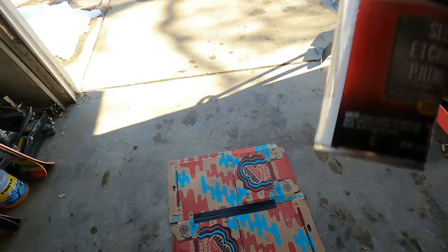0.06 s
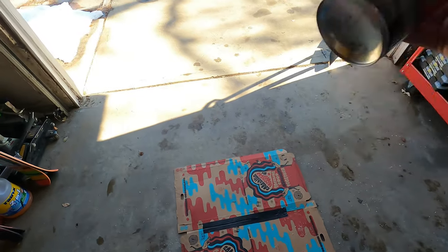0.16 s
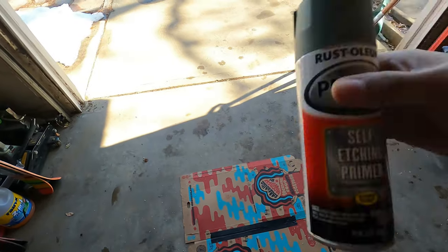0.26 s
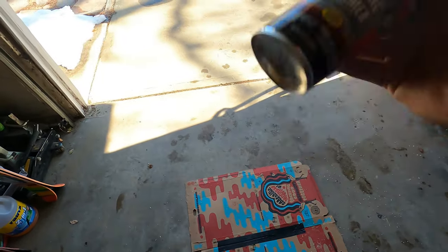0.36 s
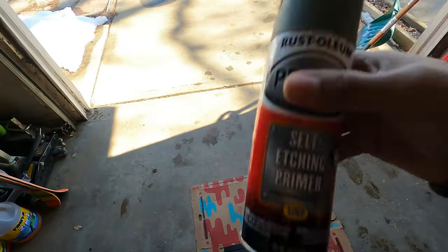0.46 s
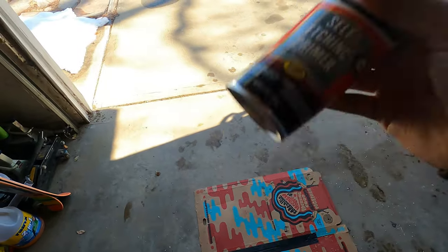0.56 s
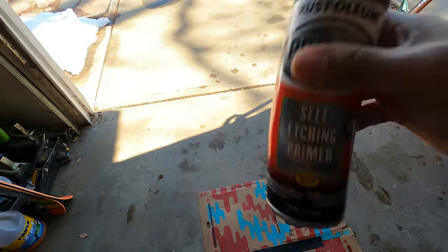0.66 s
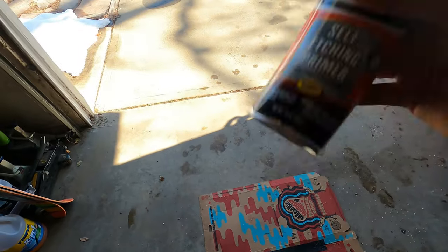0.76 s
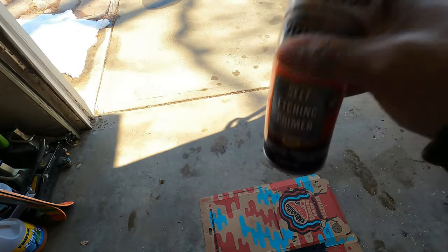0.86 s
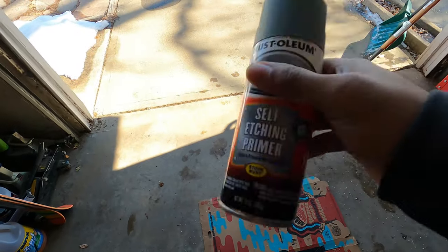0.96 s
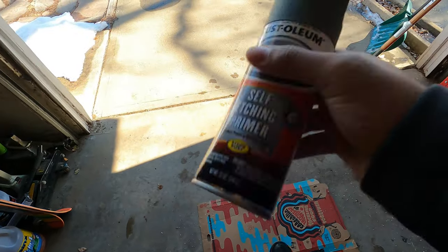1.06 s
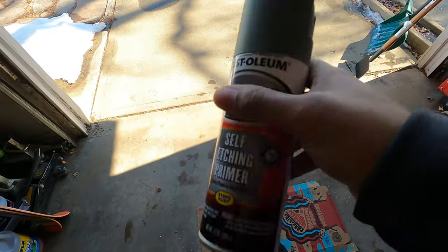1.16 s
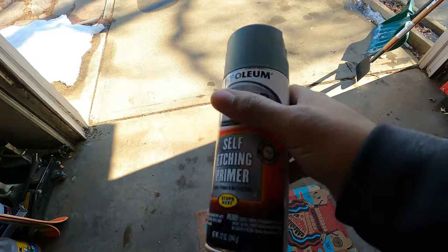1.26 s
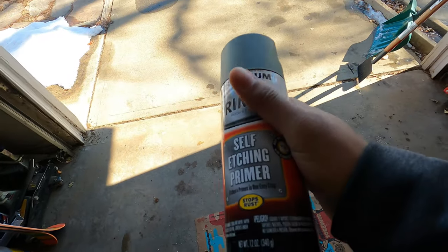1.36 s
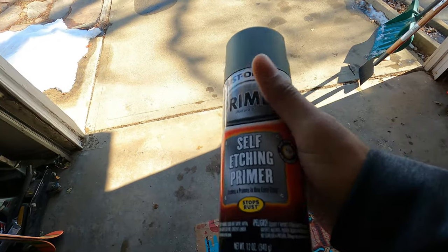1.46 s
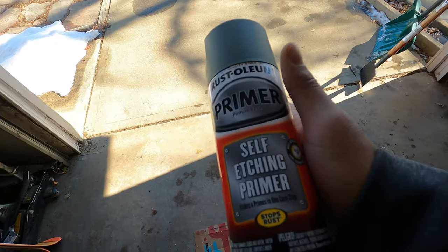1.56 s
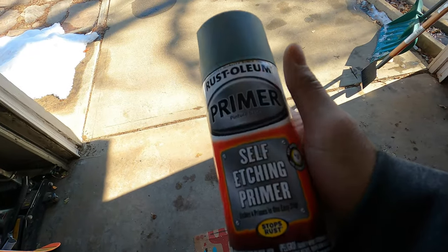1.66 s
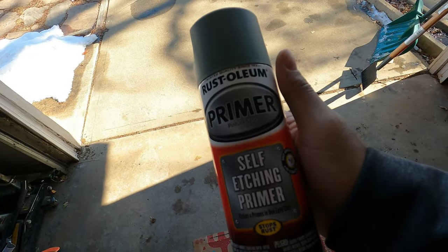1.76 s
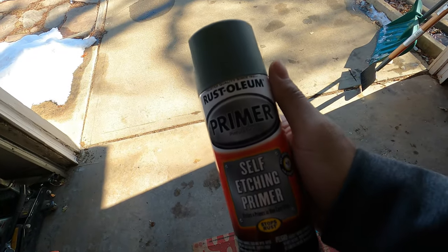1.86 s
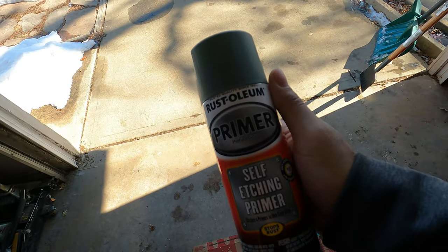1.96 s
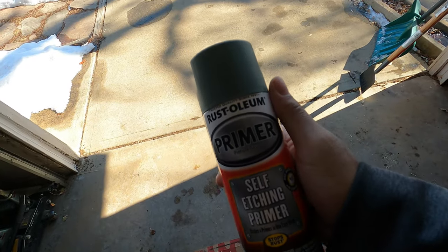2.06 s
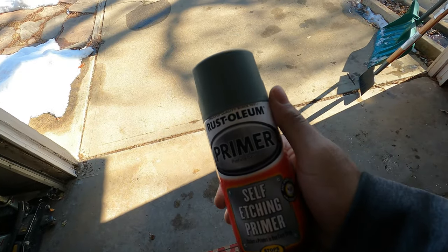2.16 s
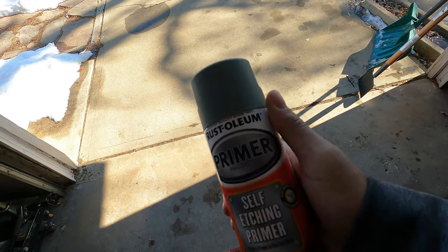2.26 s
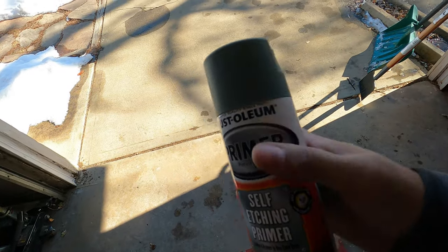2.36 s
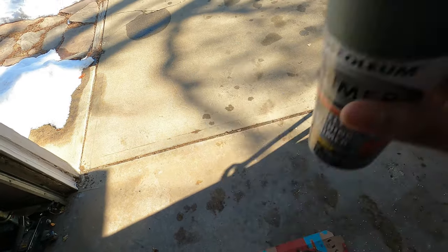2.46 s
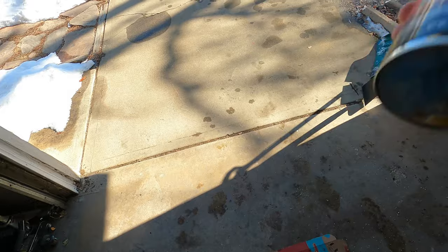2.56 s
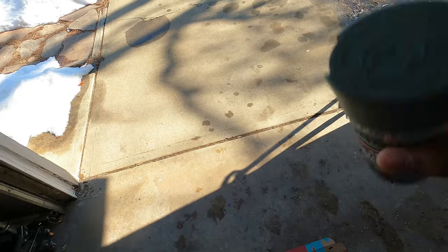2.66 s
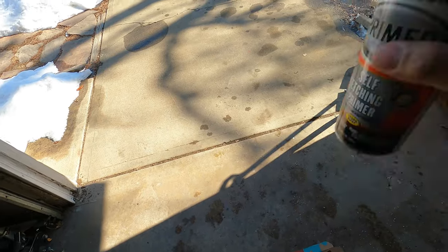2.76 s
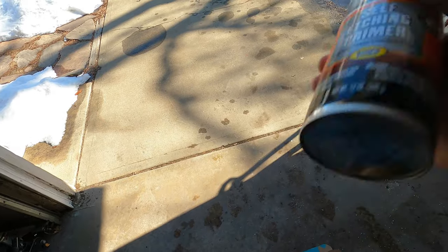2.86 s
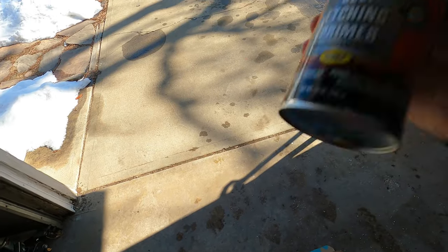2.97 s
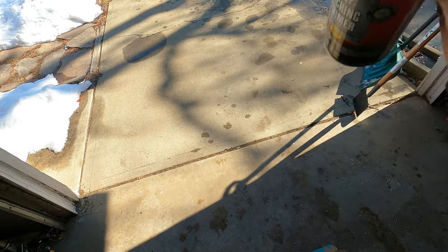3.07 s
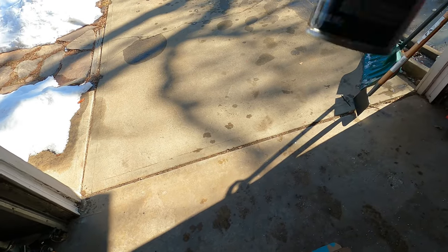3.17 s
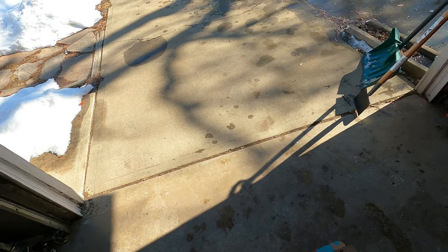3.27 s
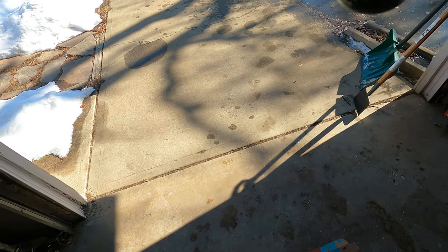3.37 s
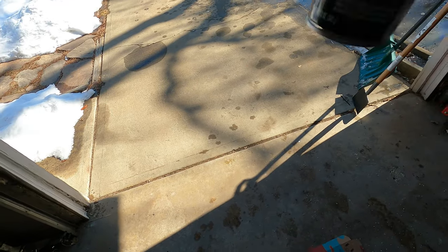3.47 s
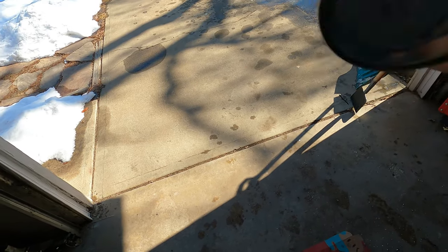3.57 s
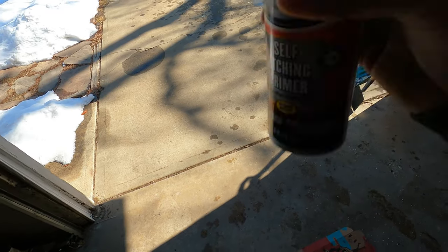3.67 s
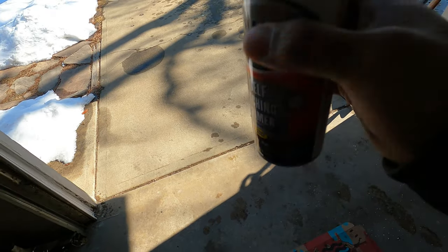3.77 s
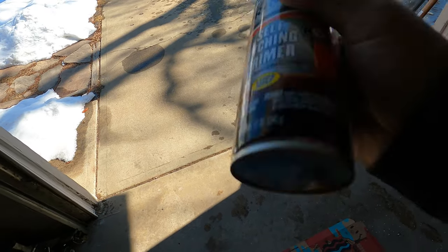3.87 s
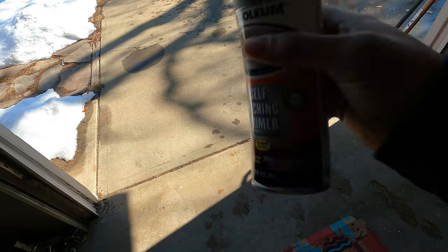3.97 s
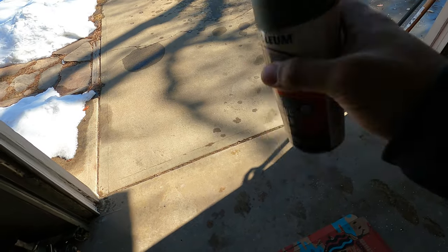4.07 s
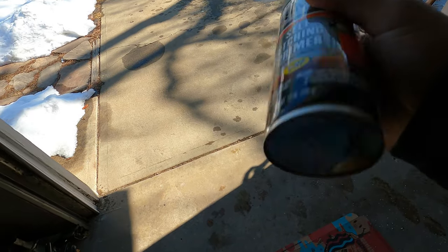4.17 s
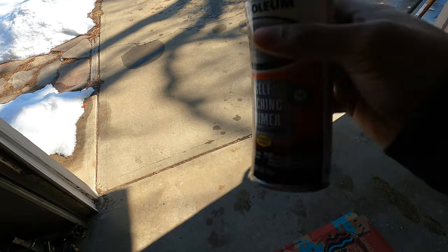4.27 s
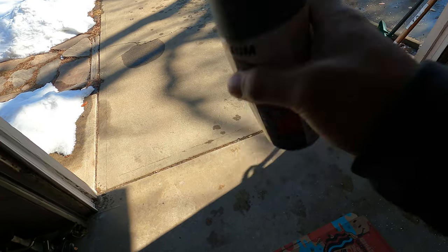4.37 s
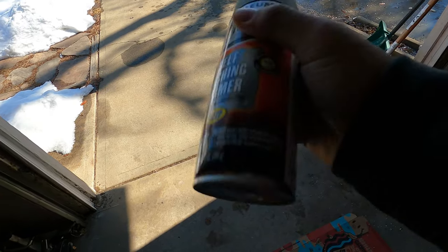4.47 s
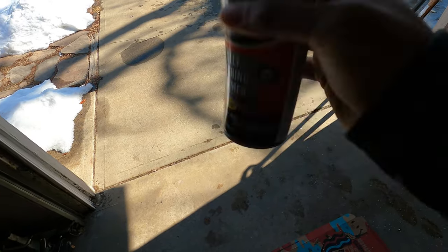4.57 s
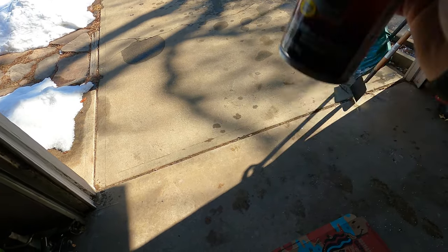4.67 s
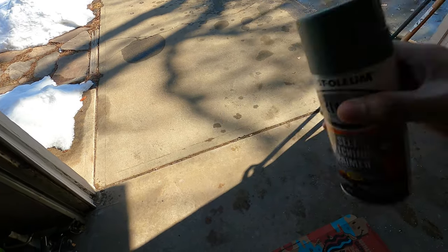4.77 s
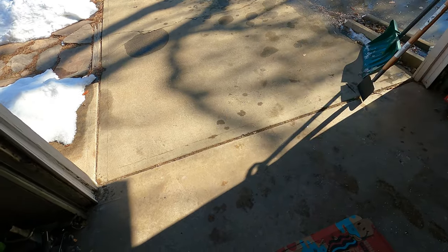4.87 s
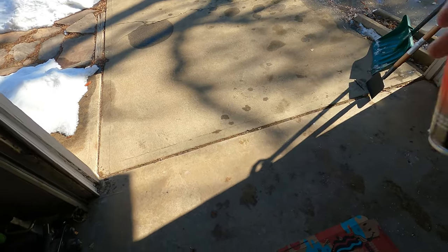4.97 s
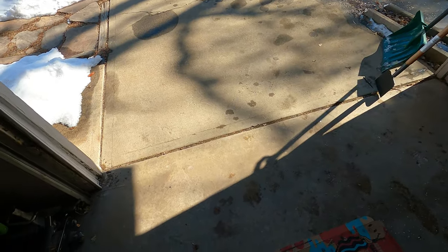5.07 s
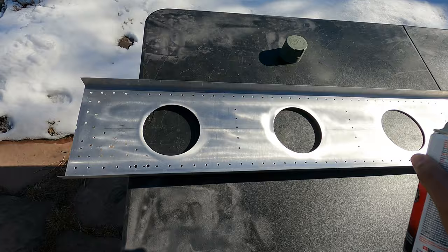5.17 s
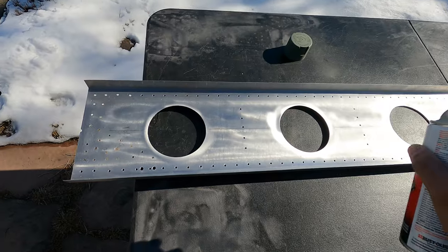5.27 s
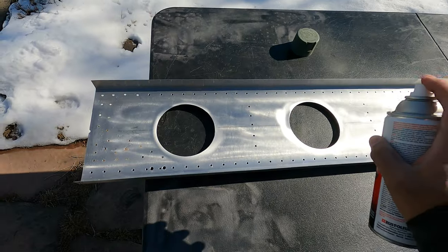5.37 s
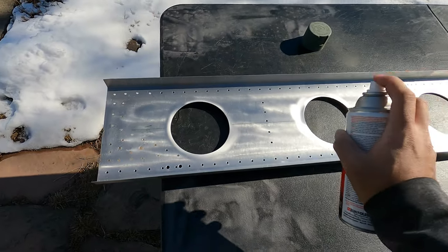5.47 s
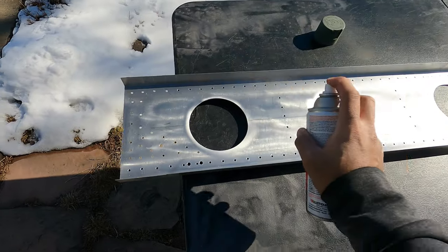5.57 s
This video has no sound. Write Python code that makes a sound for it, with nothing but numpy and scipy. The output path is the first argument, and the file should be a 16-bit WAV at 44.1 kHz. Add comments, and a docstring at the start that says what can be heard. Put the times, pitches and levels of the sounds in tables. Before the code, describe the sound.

Hard, dry rattling of a mixing ball inside an aerosol can, pausing midway, then fast and dense before stopping to leave distant traffic.

```python
"""An aerosol can is turned and shaken in a garage doorway, about an arm's length away.
Its mixing ball knocks on the paint-damped steel, made of short fading tones; short noise swells in
narrow bands surround a few knocks. Filtered noise gives the washing paint, faint rustles of hand and
sleeve, and distant traffic. The garage answers with a short noise-like tail. Near the end paint and
garage stop, leaving the traffic with one or two faint rustles."""
import sys
import numpy as np
from scipy import signal
from scipy.fft import rfft, irfft
from scipy.io import wavfile
from scipy.ndimage import uniform_filter1d

SR = 44100
rng = np.random.default_rng(int(sys.argv[2]) if len(sys.argv) > 2 else 0)


def transcribe(u):
    """Save the signal u as a 16-bit wav file named by the first command-line argument.

    u: samples, shape (n,) or (channels, n), limited to [-1, 1]; the rate is SR.
    q: integer samples, one column per channel.
    """
    v = np.clip(np.atleast_2d(u).T, -1, 1)
    q = np.round(v * 32767).astype(np.int16)
    wavfile.write(sys.argv[1], SR, q)


def amplitude_ratio(level_db):
    """Convert a level in decibels to the matching linear amplitude (field) ratio."""
    exponent = np.asarray(level_db, float) / 20
    return 10 ** exponent


N = 248283
T = np.arange(N) / SR
STOP_S = 5.246  # paint and garage tail end here
# natural tones of the thin shell of the can: pitch_hz, width_hz, level_db
SHELL_MODES = [(2120, 62, -16), (2470, 230, -8), (2800, 110, 7.5), (3020, 490, 2.5), (3560, 510, -2),
               (4100, 1350, 2.5), (4520, 450, 3), (5350, 160, 9), (6030, 750, 4), (6840, 600, 7.5),
               (8000, 71, 12)]


def curves(table):
    """Draw every column after the first as a line over time, sample by sample."""
    times_s, *columns = np.transpose(table)
    return [np.interp(T, times_s, column) for column in columns]


def unit(x):
    """Scale a sound to an average (rms) level of 1."""
    return x / np.sqrt(np.mean(x ** 2))


def shape(x, points):
    """Colour a sound by points of pitch_hz, level_db, joined evenly over the octaves."""
    point_hz, point_db = np.transpose(points)
    freq_hz = np.arange(N // 2 + 1) * SR / N + 1
    gain_db = np.interp(np.log(freq_hz), np.log(point_hz), point_db)
    return irfft(rfft(x) * amplitude_ratio(gain_db), N)


def resonate(x, peaks):
    """Pass a sound through resonances side by side (pitch_hz, width_hz, level_db), each applied twice."""
    freq_hz = np.arange(N // 2 + 1) * SR / N + 1
    gain = sum(amplitude_ratio(db) / (1 + 1j * (freq_hz - hz ** 2 / freq_hz) / width) ** 2 for hz, width, db in peaks)
    return irfft(rfft(x) * gain, N)


def walk(rate_hz):
    """Wander at random: levels held for 1 / rate_hz seconds, smoothed twice, then scaled to rms 1."""
    hold = int(SR / rate_hz)
    steps = np.repeat(rng.standard_normal(N // hold + 1), hold)
    smooth = uniform_filter1d(uniform_filter1d(steps, hold), hold)
    return unit(smooth[:N])


def grains(scatter_db):
    """Make noise whose samples are now and then much larger, like droplets and grit."""
    noise = rng.standard_normal(N)
    boost = np.minimum(rng.exponential(size=N), 7)
    return noise * amplitude_ratio(scatter_db * boost)


def swell(top_s, rise_s, fade_s):
    """Climb exponentially to a level of 1 at top_s, then die away exponentially."""
    return np.exp(-np.where(T < top_s, (top_s - T) / rise_s, (T - top_s) / fade_s))


def ring(t, hz, db, t60_s, push_s):
    """One tone swells smoothly during the contact and dies fast under the paint; it peaks at db."""
    envelope = (1 - np.exp(-t / push_s)) ** 2 * np.exp(-np.log(1000) * t / t60_s)
    return amplitude_ratio(db) * envelope / envelope.max() * np.exp(2j * np.pi * hz * t)


def knocks():
    """Each blow rings wall, dome, ticks and body; signs, decays and tick mix vary at random from blow to blow."""
    # blows of the ball on steel: start_s, wall_level_db, wall_pitch_hz, dome_level_db, tick_level_db
    ball_blows = [(0.0423, -24.5, 990, -21, -34.5), (0.0456, -20.5, 2080, -37, -49),
                  (0.3053, -32, 1020, -33, -47), (0.412, -9, 2500, -10, -25.5),
                  (0.4862, -8.5, 1490, -13, -24.5), (0.5422, -12, 1430, -25, -27.5),
                  (0.603, -17, 2450, -12, -40), (0.6035, -14.5, 1850, -17, -29.5),
                  (0.6425, -17, 1150, -34, -44.5), (0.6861, -12, 1550, -22, -17),
                  (0.6954, -11, 1440, -20, -27), (0.7219, -13, 1520, -24, -31),
                  (0.744, -23, 1550, -33, -44), (0.8036, -17.5, 1840, -7.5, -22.5),
                  (0.854, -11, 1640, -15, -37), (0.875, -12, 1450, -22, -41),
                  (0.8967, -12.5, 1700, -24, -47), (0.9037, -17, 1100, -36, -40.5),
                  (0.9343, -13.5, 1500, -22, -37), (0.9456, -16.5, 1140, -24, -27.5),
                  (0.9672, -15, 1660, -19.5, -40), (0.982, -15, 1430, -42, -40),
                  (1.0944, -10.5, 1960, -19, -35), (1.1433, -8.5, 1760, -21.5, -26),
                  (1.1745, -15, 1180, -18, -29.5), (1.1978, -13.5, 2130, -22.5, -31),
                  (1.2152, -14, 1150, -32.5, -32.5), (1.2418, -10.5, 1480, -13.5, -29),
                  (1.2708, -13, 1000, -18, -28.5), (1.2734, -14, 1460, -38, -40),
                  (1.3039, -15, 1650, -30, -50), (1.4026, -18, 1770, -25, -39.5),
                  (1.4922, -8, 1730, -18.5, -32), (1.5809, -22, 1240, -31, -43),
                  (1.6206, -15, 1440, -24, -40.5), (1.6786, -16.5, 1230, -24.5, -38),
                  (1.725, -23, 1710, -37, -46), (2.0193, -18.5, 2170, -18.5, -40),
                  (2.156, -25, 1080, -23, -53), (2.2223, -36, 990, -33, -64), (2.673, -37, 1100, -34, -52),
                  (2.7485, -25, 990, -34, -49.5), (2.7743, -9, 1210, -19.5, -35),
                  (2.839, -12.5, 1620, -25, -30), (2.8957, -16.5, 1750, -20, -34.5),
                  (2.913, -16, 1360, -32, -48), (2.9768, -16, 1830, -25, -26),
                  (2.9823, -10.5, 1570, -26, -34), (2.9875, -9.5, 1500, -35, -46),
                  (2.991, -13, 1700, -30, -43), (3.0028, -8.5, 2180, -26, -36.5),
                  (3.0139, -15, 1130, -24, -33), (3.045, -16.5, 1340, -18.5, -34),
                  (3.0749, -12.5, 1170, -16.5, -30), (3.086, -11, 1560, -13, -30),
                  (3.0984, -31, 1630, -24, -39), (3.1123, -12, 1930, -15.5, -44),
                  (3.1439, -13, 1260, -19, -34), (3.1747, -18, 1800, -12.5, -20),
                  (3.1964, -7.5, 1700, -19.5, -23), (3.245, -9, 1420, -13, -30),
                  (3.267, -10.5, 1330, -17, -42.5), (3.286, -18, 1650, -25, -39.5),
                  (3.3214, -11, 1650, -12.5, -23), (3.3274, -13.5, 1620, -30, -35),
                  (3.4135, -13.5, 1350, -25, -50), (3.4262, -11.5, 2400, -30, -37),
                  (3.4315, -19, 1670, -28, -43), (3.4582, -17, 1610, -31, -33), (3.565, -8, 1820, -24, -41),
                  (3.5704, -16, 2250, -40, -27), (3.5764, -9.5, 1260, -34, -27),
                  (3.5824, -20, 1800, -34, -34), (3.6016, -12, 1760, -42, -51.5),
                  (3.666, -10, 1540, -21.5, -32), (3.6774, -23, 1360, -29, -42),
                  (3.6928, -11, 1320, -21.5, -36), (3.717, -11, 1320, -28, -43),
                  (3.7362, -10.5, 1850, -19, -18.5), (3.7655, -7.5, 1520, -34, -43),
                  (3.7866, -22, 1750, -28, -35.5), (3.8062, -22, 1320, -32, -40),
                  (3.8097, -14, 1540, -19, -51), (3.8234, -16, 1350, -20.5, -39),
                  (3.8389, -7, 1400, -23, -42), (3.8614, -11.5, 1286, -30, -42),
                  (3.8781, -16, 1340, -24, -36), (3.8904, -9.5, 1600, -11.5, -19),
                  (3.9138, -8.5, 1550, -31, -38), (3.931, -19, 1740, -29, -37),
                  (3.9586, -10.5, 1410, -21.5, -28), (3.987, -6.5, 1500, -24.5, -38),
                  (4.0178, -13, 1770, -33, -40), (4.0198, -9, 1800, -30, -31),
                  (4.0352, -34, 1950, -30, -31), (4.0554, -7.5, 1630, -25.5, -37),
                  (4.1001, -19, 1180, -29, -34), (4.1085, -16, 1200, -21, -23.5),
                  (4.131, -9, 1640, -27, -42), (4.1513, -11, 1700, -27, -34),
                  (4.1669, -10.5, 1730, -21, -34.5), (4.1844, -23, 1680, -17, -24.5),
                  (4.2086, -8.5, 1360, -18.5, -29), (4.2529, -19, 1060, -31, -37),
                  (4.2527, -9.5, 1110, -17, -25.5), (4.2791, -10.5, 1430, -23.5, -35),
                  (4.2932, -15, 1780, -26, -47), (4.3136, -13.5, 1120, -26, -35.5),
                  (4.3303, -12, 1890, -13.5, -16.5), (4.3601, -10.5, 1770, -20.5, -31),
                  (4.3997, -16, 1230, -24, -30.5), (4.4054, -16, 1140, -20, -25),
                  (4.4161, -13.5, 1320, -18.5, -40), (4.4325, -9, 1610, -26, -37),
                  (4.4712, -15, 1700, -23, -37), (4.4862, -11, 1810, -13, -20),
                  (4.5233, -17.5, 1320, -21, -40), (4.568, -13, 1430, -21, -35),
                  (4.585, -16.5, 1400, -27, -37.5), (4.6341, -9.5, 1320, -13, -19.5),
                  (4.6557, -10.5, 1590, -27.5, -41), (4.6687, -20, 1290, -32, -34),
                  (4.677, -21, 1320, -24, -37), (4.7075, -10.5, 1880, -15, -26),
                  (4.7388, -11, 1640, -22, -31), (4.7594, -17, 1440, -21, -30),
                  (4.78, -16, 1140, -23.5, -32), (4.8047, -8.5, 1730, -25, -24.5),
                  (4.8516, -8, 1770, -18, -41), (4.8777, -6.5, 1980, -22, -23.5),
                  (4.8866, -21, 2360, -19, -45), (4.8948, -17, 2030, -26, -47),
                  (4.9023, -22, 2290, -34, -35.5), (4.9188, -21, 2180, -15.5, -32),
                  (4.93, -19.5, 1700, -30, -51), (4.9809, -23, 1700, -30, -53),
                  (5.004, -13, 1920, -23, -35), (5.0217, -19, 1310, -28, -40),
                  (5.037, -16.5, 1510, -33, -49), (5.1018, -10.5, 2200, -16, -18.5),
                  (5.1154, -25, 1750, -47, -44), (5.1245, -20, 1760, -46.5, -35),
                  (5.175, -17.5, 1890, -30, -26), (5.2009, -18.5, 1020, -40.5, -41)]
    # dome pitch before a small scatter, moving with grip and tilt: time_s, pitch_hz
    dome_pitch = [(0, 3300), (.41, 3200), (.6, 3470), (.8, 3890), (1.1, 3340), (1.7, 3580), (2.0, 2800),
                  (2.67, 3640), (2.8, 3190), (4.4, 3400), (4.9, 3294), (5.2, 3300)]
    # next tone of the wall, relative to the main one: pitch_ratio, level_db
    overtone_ratio, overtone_db = (1.441, -10.5)
    # thud of the jolted can, relative to the jolt, before pitch scatter: pitch_hz, level_db, t60_s
    thud_modes = [(206, -16.5, 0.018), (378, -0.5, 0.0067), (732, 0.5, 0.0058)]
    # bright ticks, relative to the tick level, before scatter: pitch_hz, level_db, t60_s
    tick_modes = [(5490, -1.5, 0.0025), (6150, 2, 0.0017), (7600, 1, 0.0016), (9670, -11.5, 0.0065),
                  (10240, -12, 0.0026), (12400, -11, 0.0062), (14800, -16, .003)]
    wall_t60_s, dome_t60_s = 0.0062, 0.0055  # typical time to fall 60 dB
    wall_push_s, dome_push_s, tick_push_s, thud_push_s = 0.00025, 0.00018, 0.00013, 0.0013
    jolt_db, jolt_scatter_db = -7, 1.5  # jolt of the whole can, against the mean of wall and dome
    # blows on the stiff rim ring higher and hardly jolt the can: loss in dB per octave above the knee
    jolt_knee_hz, jolt_fall_db = 1800, 41.5

    out = np.zeros(N + 1024)
    t = np.arange(1024) / SR
    chance = rng.standard_normal((len(ball_blows), 6 + 2 * len(tick_modes)))
    for (start_s, wall_db, wall_hz, dome_db, tick_db), c in zip(ball_blows, chance):
        wall_t60 = wall_t60_s * np.exp(0.072 * c[0])
        blow = ring(t, wall_hz, wall_db, wall_t60, wall_push_s)

        dome_hz = np.interp(start_s, *np.transpose(dome_pitch)) * (1 + 0.035 * c[2])
        dome_t60 = dome_t60_s * np.exp(0.198 * c[4])
        blow = blow + np.sign(c[3]) * ring(t, dome_hz, dome_db, dome_t60, dome_push_s)

        second_db = wall_db + overtone_db + 3.0 * c[4]
        second = ring(t, wall_hz * overtone_ratio, second_db, dome_t60_s, wall_push_s)
        blow = blow + np.sign(c[2]) * second

        thud_db = (wall_db + dome_db) / 2 + jolt_db + jolt_scatter_db * c[3]
        thud_db -= jolt_fall_db * max(np.log2(wall_hz / jolt_knee_hz), 0)
        for hz, db, t60 in thud_modes:
            blow = blow + ring(t, hz * np.exp(0.27 * c[1]), thud_db + db, t60, thud_push_s)

        for (hz, db, t60), (detune, mix) in zip(tick_modes, c[6:].reshape(-1, 2)):
            tick = ring(t, hz * (1 + 0.047 * detune), tick_db + db + 3.6 * mix, t60, tick_push_s)
            blow = blow + np.sign(mix) * tick

        first = int(start_s * SR)
        out[first:first + 1024] += np.sign(c[5]) * blow.imag
    return out[:N]


def shell_ringing(blows):
    """The thin shell rings on after the blows, most freely when the can is held loosely."""
    # how strongly blows drive the shell: time_s, level_db
    looseness = [(1.8, -14), (2.0, -10), (2.3, -10), (2.75, -14)]
    return resonate(blows * amplitude_ratio(curves(looseness)[0]), SHELL_MODES)


def noise_swells():
    """Short noise swells in narrow bands, at the shell's tones, peak around a few knocks and then fade."""
    # swells: top_s, level_db, brightest_hz, swell_s, fade_s
    knock_swells = [(0.411, -20, 2800, 0.0092, 0.01), (0.607, -14, 3400, 0.0057, 0.0039),
                    (0.804, -19.5, 4100, 0.0052, 0.011), (1.093, -23, 2860, 0.0033, 0.0033)]
    narrowing = 0.3  # share of the shell's mode widths
    focus_db = 18  # loss of a mode one octave from the brightest pitch
    out = 0
    for top_s, db, brightest_hz, rise_s, fade_s in knock_swells:
        modes = []
        for hz, width, mode_db in SHELL_MODES:
            octaves_away = abs(np.log2(hz / brightest_hz))
            modes.append((hz, narrowing * width, mode_db - focus_db * octaves_away))
        noise = unit(resonate(grains(2.0), modes))
        out = out + amplitude_ratio(db) * swell(top_s, rise_s, fade_s) * noise
    return out


def paint():
    """Lumps of paint and small bounces slap the wall low down; above, bands of droplet fizz flicker separately."""
    # steady wash, before the random surge: time_s, gurgle_level_db, fizz_level_db
    wash = [(0.0, -54, -69), (0.05, -41, -65.5), (0.36, -57, -52), (0.45, -38.5, -42), (0.78, -46.5, -41.5),
            (0.91, -33, -39), (1.04, -50, -53), (1.25, -32, -40), (1.44, -48.5, -58), (1.72, -51.5, -59),
            (1.8, -63.5, -69.5), (2.5, -75, -87), (2.56, -56.5, -62.5), (2.75, -52, -69), (3.0, -41, -49),
            (3.8, -40, -52.5), (4.5, -39, -57.5), (5.07, -44.5, -49), (5.23, -47, -50.5)]
    # splashes at the turns of the shake, before the surge: top_s, gurgle_level_db, fizz_level_db
    splashes = [(.45, -85, -39.5), (.61, -35, -25.5), (.81, -68, -35), (2.778, -35.5, -51),
                (2.848, -25.5, -45.5), (2.992, -33, -35.5), (3.118, -26, -31), (3.268, -60, -40),
                (3.339, -37.5, -54), (3.438, -26, -42.5), (3.58, -25.5, -64), (3.68, -41, -35.5),
                (3.83, -35, -43), (4.121, -48.5, -47), (4.63, -31, -58), (4.9, -71, -32.5),
                (5.188, -31.5, -46.5)]
    # low slapping bands: pitch_hz, width_hz, level_db
    gurgle_bands = [(1500, 1610, 0), (1986, 110, -6)]
    # high droplet bands: pitch_hz, width_hz, level_db
    fizz_bands = [(3300, 1730, 12.5), (4270, 470, -13), (6450, 3300, -1), (7650, 2000, -13.5),
                  (12000, 2900, -52.5)]
    splash_rise_s, splash_fade_s = 0.0076, 0.019

    surge = amplitude_ratio(1.5 * walk(40))
    gurgle = unit(resonate(grains(4.0) * amplitude_ratio(3.0 * walk(150)), gurgle_bands))
    fizz = unit(sum(resonate(grains(3.0) * amplitude_ratio(3.0 * walk(70)), [band]) for band in fizz_bands))
    gurgle_db, fizz_db = curves(wash)
    low, high = amplitude_ratio(gurgle_db), amplitude_ratio(fizz_db)
    for top_s, low_db, high_db in splashes:
        splash = swell(top_s, splash_rise_s, splash_fade_s)
        low = low + amplitude_ratio(low_db) * splash
        high = high + amplitude_ratio(high_db) * splash
    return (T < STOP_S) * surge * (gurgle * low + fizz * high)


def rustles():
    """Hand and sleeve rustle faintly: short broad puffs of gritty noise."""
    # puffs: top_s, level_db, centre_hz, swell_s, fade_s
    puffs = [(1.585, -48, 5950, 0.0039, 0.022), (2.35, -66.5, 4480, 0.0029, 0.018),
             (5.27, -65, 4450, 0.01, 0.021), (5.478, -56.5, 6840, 0.0037, 0.011)]
    out = 0
    for top_s, db, hz, rise_s, fade_s in puffs:
        grit = unit(resonate(grains(2.8), [(hz, 0.5 * hz, 0)]))
        out = out + amplitude_ratio(db) * swell(top_s, rise_s, fade_s) * grit
    return out


def garage(x):
    """A dense short tail builds up after the first wall; bare concrete favours the treble."""
    # tone of the tail: pitch_hz, level_db
    concrete_tone = [(300, -16.5), (1500, 1.5), (3500, 0), (7000, 2.5), (12000, -12)]
    tail_db, t60_s, gap_s = -13.5, 0.1, 0.0005  # level before the tone is applied, fall time, build-up time
    t = np.arange(16384) / SR
    fall = np.exp(-np.log(1000) * t / t60_s)
    tail = rng.standard_normal(16384) * fall * np.tanh((t / gap_s) ** 3)
    tail = tail * amplitude_ratio(tail_db) / np.sqrt(np.sum(tail ** 2))
    echo = shape(signal.fftconvolve(x, tail)[:N], concrete_tone)
    return (T < STOP_S) * echo


def road():
    """Distant traffic: smooth tyre roar, and a wavering rumble of noise with a few engine hums."""
    # levels before random wavering: time_s, roar_level_db, rumble_level_db
    traffic = [(0, -36, -41), (.36, -37, -39.5), (.45, -44, -38), (.75, -38, -43), (1.1, -39, -39.5),
               (1.45, -39, -45), (1.8, -38, -42.5), (2.4, -36, -40.5), (2.6, -39, -40.5), (3.0, -38, -39),
               (3.6, -40, -40), (4.4, -47.5, -41.5), (4.8, -49, -41), (5.24, -41.5, -49.5),
               (5.25, -33, -39.5), (5.4, -34.5, -36), (5.63, -34.5, -33.5)]
    # tone of the tyre roar: pitch_hz, level_db
    roar_tone = [(180, -47), (300, -11.5), (450, -9.5), (590, -9.5), (680, -1), (900, -2.5), (1250, -7),
                 (1500, -16.5), (2500, -30.5), (4500, -51), (8000, -52), (13500, -80), (15000, -87)]
    # tone of the engine rumble: pitch_hz, level_db
    rumble_tone = [(15, -34), (25, -1), (81, 1), (114, -5), (172, -4.5), (200, -6), (232, -4.5),
                   (276, -11.5), (320, -19), (420, -49), (700, -120)]
    # hums of far engines: pitch_hz, width_hz, level_db
    engine_hums = [(32.4, 12.8, 2), (58, 9, -9.5), (81.4, 4, -4), (112, 12.5, -0.5), (150.7, 9.8, -5)]
    roar_db, rumble_db = curves(traffic)
    roar = unit(shape(rng.standard_normal(N), roar_tone)) * amplitude_ratio(roar_db + 0.8 * walk(9))
    rumble = unit(shape(rng.standard_normal(N), rumble_tone))
    hums = unit(resonate(rng.standard_normal(N), engine_hums))
    engines = unit(rumble + amplitude_ratio(1.0) * hums)
    return roar + engines * amplitude_ratio(rumble_db + 1.9 * walk(6.5))


def ports(mid):
    """Two close microphone ports: sound from the right reaches the left later, weaker and scattered."""
    # how unlike the ports hear, before the stereo width: pitch_hz, side_level_db
    spread = [(30, -39), (150, -61.5), (500, -13.5), (2000, -21.5), (6000, -7), (12000, -7)]
    # the housing hides the lag in the treble: pitch_hz, level_db
    lag_reach = [(4000, -3), (7000, -8.5), (10000, -31)]
    # almost mono at first, wider from 2.8 s, almost mono again at the end: time_s, width_0_to_1
    stereo_width = [(0, .02), (2.74, .02), (2.8, .3), (3.3, .6), (3.8, .8), (5.0, 1.), (5.24, 1.),
                    (5.25, .02)]
    # the left port is deaf around here: pitch_hz, width_hz, side_level_db
    left_notch = (13300, 3400, -2)
    lag_s, left_loss = 0.00002, 0.075  # at full stereo width; added on one side, taken from the other

    scatter = rng.standard_normal(2048) * np.exp(-np.arange(2048) / 200.0)
    scatter = scatter / np.sqrt(np.sum(scatter ** 2))
    unlike = shape(signal.fftconvolve(mid, scatter)[:N], spread)
    # for a tiny lag, the delay is the slope of the sound times the lag
    late = shape(lag_s * SR * np.gradient(mid), lag_reach)
    side = curves(stereo_width)[0] * (unlike - left_loss * mid - late)
    side = side - resonate(mid, [left_notch])
    return np.array([mid + side, mid - side])


def scene():
    """Mix the can and its garage tail with the rustles and the road, and hear them at both ports."""
    blows = knocks()
    blows = blows + shell_ringing(blows)
    can = blows + paint() + noise_swells()
    return ports(can + garage(can) + rustles() + road())


def low_pass(x):
    """Removes everything above the highest recorded frequency."""
    return signal.sosfilt(signal.butter(12, 16490, fs=SR, output="sos"), x)


def record(dry):
    """The microphone rolls off gently above 11200 Hz."""
    rolloff = signal.butter(2, 11200, fs=SR, output="sos")
    mix = signal.sosfilt(rolloff, dry)
    return low_pass(mix)


dry = scene()
out = record(dry)
transcribe(out)
```